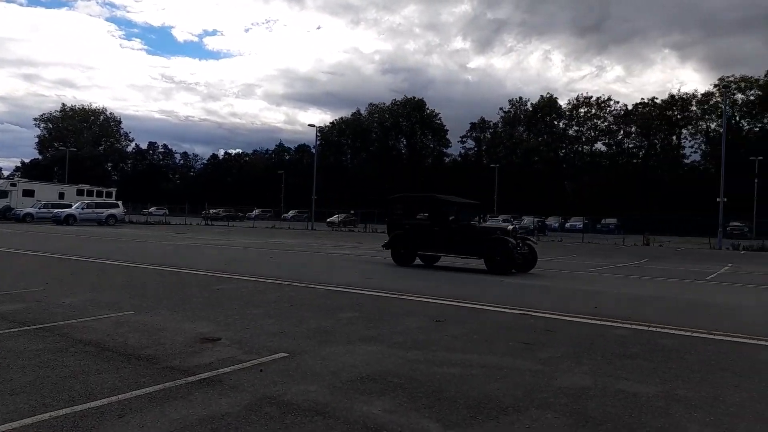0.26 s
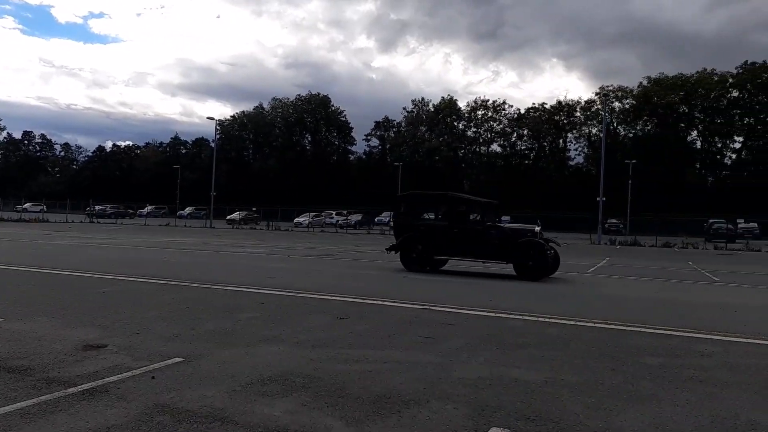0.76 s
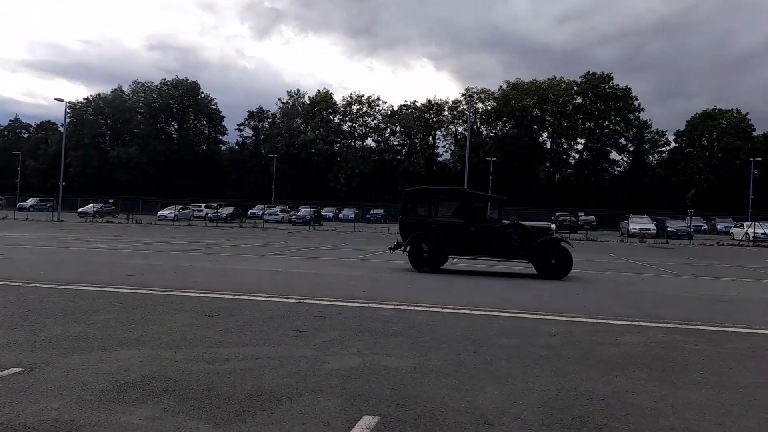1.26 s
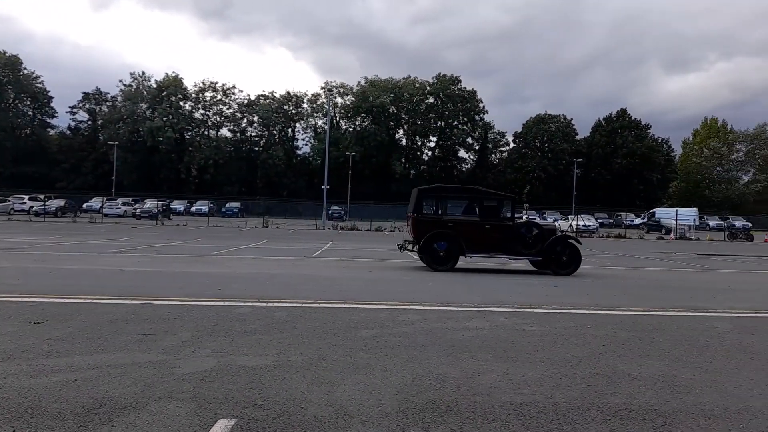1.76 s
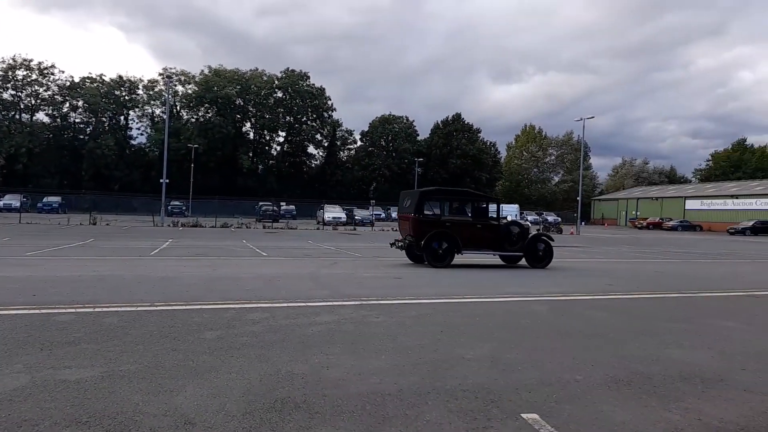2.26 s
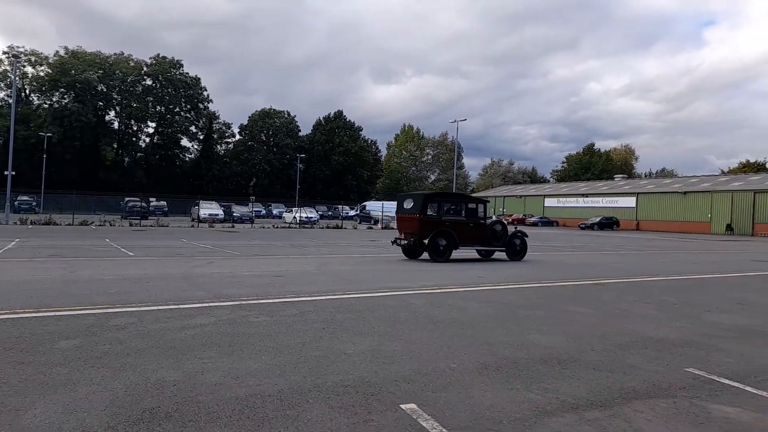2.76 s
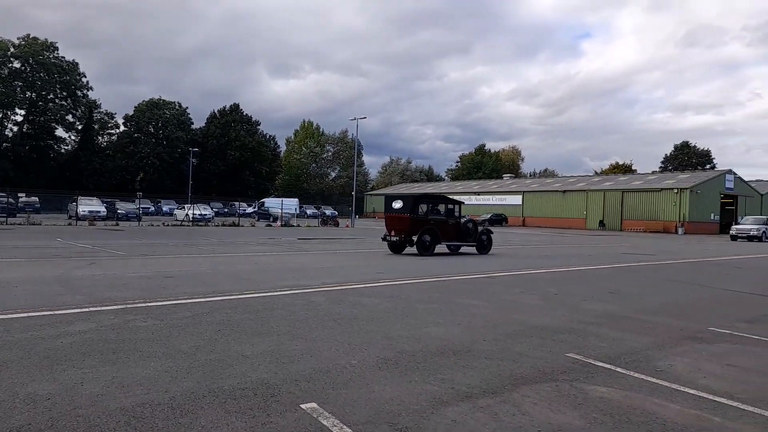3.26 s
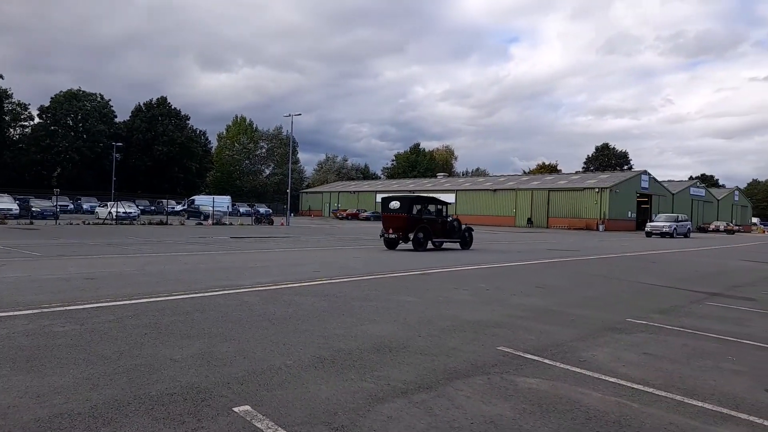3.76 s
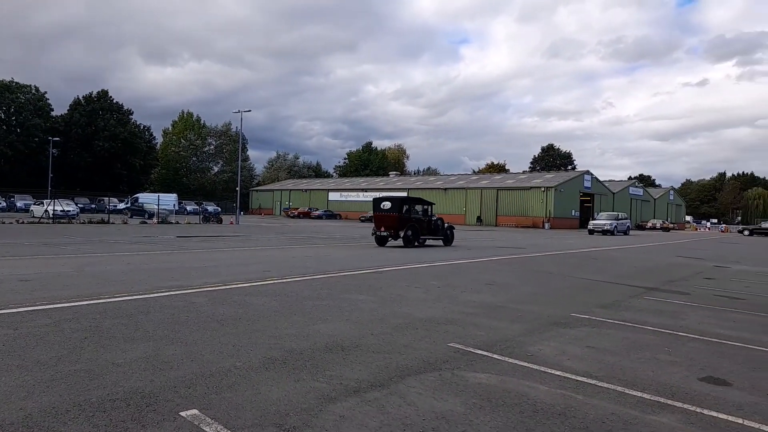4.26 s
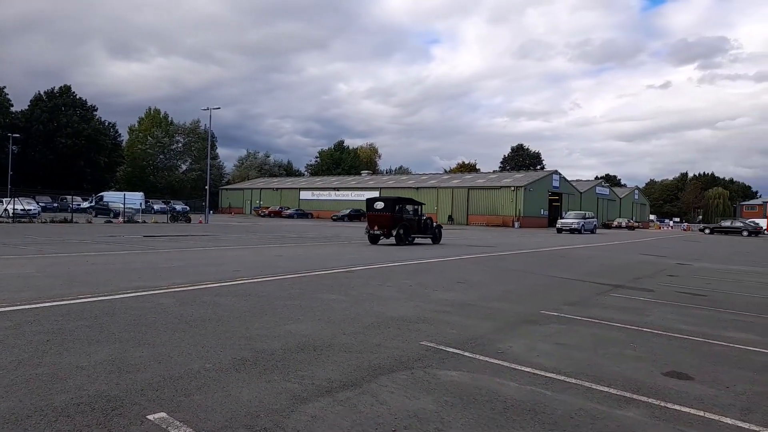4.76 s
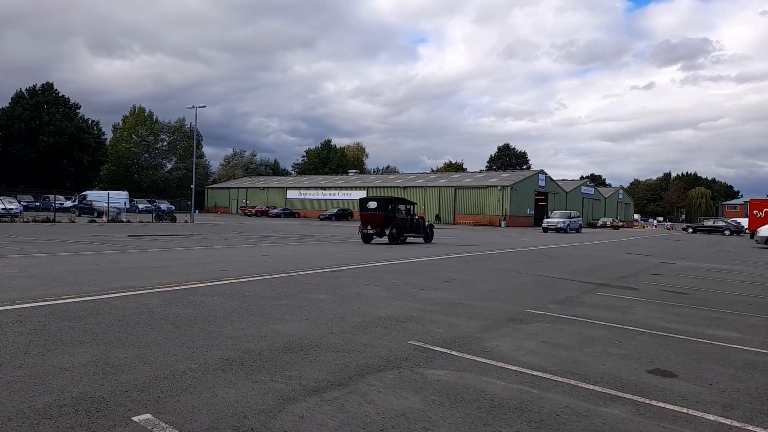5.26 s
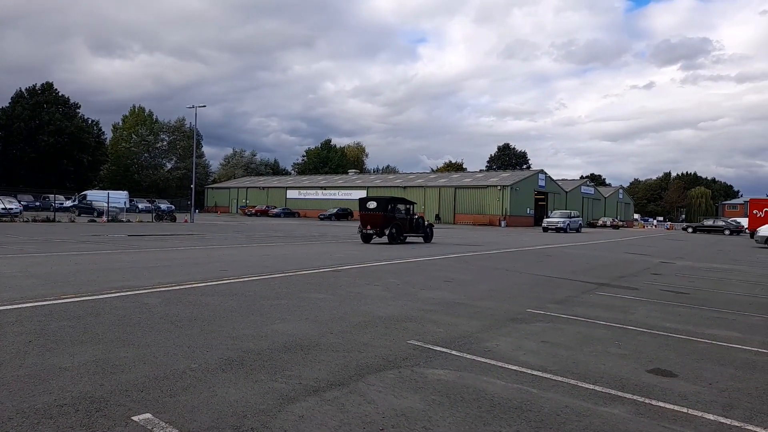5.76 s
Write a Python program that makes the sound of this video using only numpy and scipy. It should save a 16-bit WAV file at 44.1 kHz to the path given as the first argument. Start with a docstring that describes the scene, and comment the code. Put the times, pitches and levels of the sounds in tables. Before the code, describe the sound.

In an open car park with a soft distant road wash, a vintage four-cylinder car pulls away in low gear. From 0 to 2.1 seconds its buzzing exhaust drone and gear whine climb, the rise gradually flattening, over rough growl and clatter pulsing with each firing. A stone snaps near 1.8; a faint metallic tick appears around 2. At 2.2 a low thump marks the lift-off: whine and exhaust vanish quickly, leaving fading mechanical noise. Wind buffets mainly the left from 1.5 to 3, strongest near 2.6. Irregular dull thumps continue from 2.7 to 4.4, with thin, very high brake squeals around 3.4, echoing lightly. From about 4 a nearer car swells in, humming low, passing left to right around 4.75. Stones snap; short, slightly lower squeals sound near 4.85 and 5.2. Tyre roar peaks around 5, with rush and hiss building, then darkens and begins receding by 6.

```python
"""A vintage four-cylinder car accelerates across an open car park in low gear, then lifts off and coasts away.
Its exhaust and gear whine are tones locked to the crank; its clatter is noise throbbing with each firing.
Wind is coloured noise, with gusts mostly on the left; low thumps and snapping stones are short bursts.
A second car rolls close past from left to right: a tonal engine hum, tyre noise whose colour deepens,
and a few high brake squeals that echo. A distant road washes underneath."""
import sys
import numpy as np
from scipy import signal
from scipy.fft import rfft, irfft
from scipy.io import wavfile
from scipy.ndimage import uniform_filter1d, map_coordinates

SR = 44100
rng = np.random.default_rng(int(sys.argv[2]) if len(sys.argv) > 2 else 0)


def wav_record(signal):
    """Record a signal, one row per channel, as 16-bit PCM in the file named by sys.argv[1]."""
    frames = np.transpose(np.atleast_2d(signal))
    bounded = np.clip(frames, -1, 1)
    # unit amplitude maps onto the largest positive 16-bit level
    quanta = np.round(bounded * 32767).astype(np.int16)
    wavfile.write(sys.argv[1], SR, quanta)


N = 264582
TIME = np.arange(N) / SR
FREQS = np.fft.rfftfreq(N, 1 / SR)


def gain_of(db):
    """Decibels to amplitude."""
    return 10 ** (np.asarray(db) / 20)


def evened(x):
    """Scales to rms 1."""
    return x / np.sqrt(np.mean(x ** 2) + 1e-20)


def read(points, hz):
    """Reads a curve of (hz, value) along a log-frequency axis."""
    f, value = np.transpose(points)
    return np.interp(np.log(hz + 1), np.log(f + 1), value)


def drift(rate_hz):
    """Slow random motion of about rms 1, made of noise with the motion above rate_hz filtered away."""
    points = 4096
    hz = np.fft.rfftfreq(points, N / SR / points)
    coarse = irfft(rfft(rng.standard_normal(points)) / (1 + (hz / rate_hz) ** 4))
    return np.interp(TIME, np.linspace(0, N / SR, points), evened(coarse))


def noise(colour):
    """Noise with a given spectrum, at rms 1."""
    return evened(irfft(rfft(rng.standard_normal(N)) * gain_of(read(colour, FREQS)), N))


def arriving(x, lead_ms):
    """Left/right pair: a source on the right (positive lead) reaches the right microphone first."""
    half = lead_ms * SR / 2000
    sides = (-1, 1)
    return np.array([map_coordinates(x, [np.arange(N) + side * half], order=3, mode="nearest") for side in sides])


# Likeness of scattered sound at the two microphones: frequency_hz, likeness (-1 to 1)
LIKENESS = [(60, -0.85), (250, 0.35), (450, 0.85), (700, -0.6), (1300, -0.61), (2500, 0.47), (15000, -0.16)]


def outdoors(colour, lead_ms, scattered):
    """Noise from one direction, with a share (0-1) scattered by ground, trees and buildings."""
    left, other = rfft(rng.standard_normal((2, N)))
    same = np.clip(read(LIKENESS, FREQS), -1, 1)
    share = np.clip(scattered, 0, 1)
    right = same * left + np.sqrt(1 - same ** 2) * other
    spread = irfft(np.array([left, right]) * gain_of(read(colour, FREQS)), N)
    return np.sqrt(1 - share) * arriving(noise(colour), lead_ms) + np.sqrt(share) * evened(spread)


def partial(turns, multiple, fade_db, fade_rate_hz, lag=None):
    """One tone of a rotating part, fading in and out by chance; its lag (cycles) is random unless given."""
    lag = rng.random() if lag is None else lag
    return np.sqrt(2) * gain_of(fade_db * drift(fade_rate_hz)) * np.cos(2 * np.pi * (multiple * turns - lag))


def swell(from_s, until_s, db, rise_db_per_s, fall_db_per_s):
    """A level in dB that rises, holds and falls."""
    return db - rise_db_per_s * np.maximum(from_s - TIME, 0) - fall_db_per_s * np.maximum(TIME - until_s, 0)


def puff(s, length_s):
    """A smooth rise and fall around one moment."""
    return np.exp(-(2 * (TIME - s) / length_s) ** 2)


def swept(pair, peak, boost_db, octaves):
    """Makes one moving band stand out: lifts it by half of boost_db and lowers the rest by half."""
    hz, t, z = signal.stft(pair, SR, nperseg=1024, noverlap=768)
    centre = np.interp(t, *np.transpose(peak))
    away = np.log2((hz[:, None] + 1) / centre) / octaves
    tilt = gain_of(boost_db * (np.exp(-away ** 2) - .5))
    return signal.istft(z * tilt, SR, nperseg=1024, noverlap=768)[1][:, :N]


LIFT_OFF_S, DIE_DB_PER_S = 2.16, 74  # the driver lifts off; exhaust note and growl die away at this rate
RECEDE_DB_PER_S = 1.5  # the vintage car drives away


def coasting():
    """Seconds since the driver lifted off."""
    return np.maximum(TIME - LIFT_OFF_S, 0)


# crank: turns per second, gain per second, loss of that gain per second
START_SPEED, PULL, PULL_FADE = 44.33, 7.62, 1.2
CLUTCH_S, SETTLED_SPEED, SINK_S = 2.27, 53, 0.31  # clutch down: speed sinks towards this, time constant


def crank_speed():
    """Turns per second: a flattening climb under load, then an exponential sag with the clutch down."""
    pulling = np.minimum(TIME, CLUTCH_S)
    climb = START_SPEED + PULL * pulling - PULL_FADE * pulling ** 2 / 2
    return SETTLED_SPEED + (climb - SETTLED_SPEED) * np.exp(-(TIME - pulling) / SINK_S)


def machine_level(db, drop_db, settle_s):
    """Mechanical noise fades with distance and settles lower once the load is off."""
    return db - RECEDE_DB_PER_S * TIME - drop_db * (1 - np.exp(-coasting() / settle_s))


def sizzle_db():
    """Level of the vintage car's fine high mechanical noise, which also scales its small stones."""
    return machine_level(-41, drop_db=30, settle_s=0.87)


# Exhaust tones: crank_multiple, relative_level_db
ORDERS_DB = [(1, 4.5), (2, 0), (2.5, -20.5), (3, 1), (4, 2.5), (5, -1), (6, -14), (7, -15), (8, -2.5),
             (9, -14), (10, -14), (11, -17), (13, -19.5), (14, -20), (31, -27)]
# Colour of the silencer and tail pipe: frequency_hz, gain_db
PIPE = [(45, -21), (60, -14), (90, -1.5), (115, 5.5), (136, 4), (170, -12), (200, -4), (230, -11),
        (280, -14), (400, -11), (800, -3), (1800, -6)]
# the pipe delays higher orders more, smearing the puffs into a drone: lag in cycles per squared multiple
PIPE_SMEAR = .28


def exhaust(speed, turns, load_db, low_fade_db=1.74, high_fade_db=3, trim_db=-6.5):
    """Two firings a turn; unequal cylinders add the other orders, and the pipe colours them as they climb."""
    lines = np.zeros(N)
    for k, db in ORDERS_DB:
        fade_db = low_fade_db if k < 5 else high_fade_db
        piped = gain_of(db + read(PIPE, k * speed))
        lines += piped * partial(turns, k, fade_db, 5.7, PIPE_SMEAR * k ** 2)
    uneven_firing = 1 + 0.068 * drift(21)
    return lines * uneven_firing * gain_of(load_db + trim_db)


# teeth meeting per turn of the crank in the two gear pairs and the timing gear
FIRST_MESH, SECOND_MESH, TIMING_TEETH = 6.19, 4.315, 24
GEARS_DIE_DB_PER_S = 120  # unloaded teeth fall silent faster than the exhaust
# Whines swelling through casing resonances: crank_multiple, level_db, resonance_hz, width_hz, boost_db
WHINES = [(FIRST_MESH, -32.5, 328, 46, 13), (SECOND_MESH, -35, 242, 16, 8), (8.3, -52, 464, 32, 16),
          (2 * FIRST_MESH, -46, 645, 44, 10), (16, -47, 850, 50, 9), (3 * FIRST_MESH, -46, 1050, 36, 4),
          (22.1, -57, 1237, 28, 14), (TIMING_TEETH, -56, 1140, 120, 14),
          (4 * FIRST_MESH, -51, 1252, 46, 15.5), (TIMING_TEETH, -54, 1357, 44, 17.5),
          (32, -58, 1620, 160, 9)]
# Overtones of the meshes: gear_pair (1 or 2), mesh_multiple, level_db
OVERTONES = [(1, 5, -51.5), (2, 2, -49.5), (2, 3, -59), (2, 5, -53)]


def gears(turns, overtone_fade_db=2.0, whine_fade_db=.5, low_flutter=0.21, high_flutter=0.31):
    """Straight-cut teeth whine at fixed multiples of the crank; the load on them flutters."""
    speed, low, high = crank_speed(), np.zeros(N), np.zeros(N)
    for multiple, db, hz, width, boost_db in WHINES:
        ringing_db = boost_db / (1 + (2 * (multiple * speed - hz) / width) ** 4)
        line = gain_of(db + ringing_db) * partial(turns, multiple, whine_fade_db, 6)
        if multiple < 10:
            low += line
        else:
            high += line
    for pair, k, db in OVERTONES:
        mesh = FIRST_MESH if round(pair) == 1 else SECOND_MESH
        low += gain_of(db) * partial(turns, round(k) * mesh, overtone_fade_db, 1.4)
    whine = low * (1 + low_flutter * drift(45)) + high * (1 + high_flutter * drift(50))
    return gain_of(-GEARS_DIE_DB_PER_S * coasting()) * whine


# Push of the four cylinders, in firing order: relative_strength
CYLINDERS = [1.5, .7, 1.4, .6]
# Engine block and bonnet resonances: frequency_hz, relative_level_db, t60_s
BLOCK = [(481, -0.5, 0.0305), (648, -6, 0.019), (742, 2, 0.023), (955, -3, 0.012), (1140, -12, 0.011),
         (1480, -11, 0.051), (2070, -9.5, 0.0093)]
GROWL_DB, GROWL_ROUGH = -32, .35  # level before the fades; how much one firing differs from the next


def growl(turns):
    """Each firing strikes the block, never twice quite alike; the ringing dies away with the load."""
    firing = (2 * turns).astype(int)
    blows = np.diff(firing, prepend=0) * np.take(CYLINDERS, firing, mode="wrap")
    t = TIME[:SR // 20]
    rings = np.zeros(N)
    for hz, db, t60 in BLOCK:
        ring = gain_of(db - 60 * t / t60) * np.sin(2 * np.pi * hz * t)
        uneven_blows = blows * (1 + GROWL_ROUGH * rng.standard_normal(N))
        rings += signal.oaconvolve(uneven_blows, ring)[:N]
    return gain_of(GROWL_DB - RECEDE_DB_PER_S * TIME - DIE_DB_PER_S * coasting()) * evened(rings)


# each firing's clatter builds up over this time and decays with this share of the gap to the next
FIRING_RISE_S, FIRING_DECAY = .0016, .3


def firing_throb(turns, depth=0.5):
    """Pulsing envelope of rms 1: one smoothed, decaying pulse for each firing, plus a little chance."""
    strength = np.take(CYLINDERS, (2 * turns).astype(int), mode="wrap")
    firings = strength * np.exp(-(2 * turns % 1) / FIRING_DECAY)
    rise = round(FIRING_RISE_S * SR)
    smooth = uniform_filter1d(uniform_filter1d(firings, rise), rise)
    return evened(1 + depth * smooth + 0.11 * drift(60))


# Clatter of valve gear, fan and chassis: frequency_hz, gain_db
CLATTER_COLOUR = [(70, -32), (130, -13), (170, -15), (270, -11.5), (330, -6), (385, -20.5), (465, -14),
                  (585, -20), (835, -21), (1370, -25), (1700, -27.5), (2700, -35), (3500, -43.5),
                  (4550, -61), (7700, -120)]
# Fine high noise of the machinery: frequency_hz, gain_db
SIZZLE_COLOUR = [(1800, -1), (2700, 2), (3300, -5.5), (4300, -5.5), (6300, -6), (7300, -8.5), (8200, -17.5),
                 (10000, -14.5), (11200, -12), (15600, -18)]
# Brightest band of the engine noise, sinking as the car drives on: time_s, frequency_hz
ENGINE_PEAK = [(0.1, 1060), (.75, 990), (1.25, 814), (1.8, 760), (2.8, 664)]


def machinery(turns, lead_ms, sizzle_throb=0.9, peak_db=5.0, peak_octaves=0.24):
    """Clatter and sizzle are noise throbbing with each firing; the block growls among them."""
    throb = firing_throb(turns)
    clatter_gain = gain_of(machine_level(-24.5, drop_db=14, settle_s=0.36))
    clatter = throb * clatter_gain * outdoors(CLATTER_COLOUR, lead_ms, scattered=0.23)
    body = swept(clatter + arriving(growl(turns), lead_ms), ENGINE_PEAK, peak_db, peak_octaves)
    sizzle = abs(throb) ** sizzle_throb * gain_of(sizzle_db()) * outdoors(SIZZLE_COLOUR, lead_ms, scattered=0.59)
    return body + sizzle


# Exhaust level as the driver works the throttle, before the exhaust trim: time_s, load_db
THROTTLE = [(0, -20), (1.25, -20.5), (1.5, -21), (1.68, -20.5), (2.1, -22.5)]


def vintage_car(lead_ms=0.09):
    """One slightly unsteady crank drives the exhaust, gear whine, machinery and a loose fitting."""
    speed = crank_speed() * (1 + .002 * drift(16))
    turns = np.cumsum(speed) / SR
    load_db = np.interp(TIME, *np.transpose(THROTTLE)) - DIE_DB_PER_S * coasting()
    tones = exhaust(speed, turns, load_db) + gears(turns)
    return arriving(tones, lead_ms) + machinery(turns, lead_ms) + rattle(turns)


# Colour of the distant road: frequency_hz, gain_db
TRAFFIC = [(88, -17), (150, -2), (280, -3.5), (370, -6), (460, -3.5), (570, -9.5), (810, 1.5), (1100, -9.5),
           (1700, -16), (3050, -33), (6000, -33.5), (7300, -40.5), (8200, -52), (12000, -42.5),
           (15600, -46)]


def distant_road():
    """Far traffic blends into a slowly wavering, widely scattered wash of noise."""
    return gain_of(-34 + 1.7 * drift(2.9)) * outdoors(TRAFFIC, 0.086, scattered=0.96)


# Rumble of air and cars: frequency_hz, gain_db
RUMBLE_COLOUR = [(20, -30), (35, -12.5), (55, 4.5), (75, 4), (120, 3.5), (170, -5), (260, -15.5),
                 (500, -58), (3000, -110)]
# Strongest gusts, at their left-hand levels: time_s, length_s, level_db, flutter_level_db
GUSTS = [(1.626, 0.049, -41, -45), (2.595, 0.036, -15.5, -24), (2.656, 0.024, -15.5, -33),
         (2.801, 0.11, -25, -30.5), (2.92, 0.064, -34, -22.5)]
# Body of a gust: frequency_hz, gain_db
GUST_COLOUR = [(20, -29), (45, -9), (90, 5), (140, -4), (250, -13.5), (400, -27), (800, -53), (4000, -100)]
# Higher flutter of a gust: frequency_hz, gain_db
FLUTTER_COLOUR = [(70, -36), (140, 4), (260, 0), (400, -12), (600, -24), (2000, -80)]


def wind(right_db=-16, lump_db=1.8, apart_db=-4.5, buffet_db=2):
    """A lumpy rumble of air and cars, deep eddies at each microphone alone, and gusts mostly on the left."""
    eddy_colour = [(20, -22), (40, 14), (60, 6.0), (110, 5), (250, -17), (500, -37), (3000, -110)]
    apart = gain_of(apart_db) * np.array([noise(eddy_colour) for _ in range(2)])
    air = gain_of(-39)
    vintage = gain_of(swell(0.45, 2.1, -33.5, rise_db_per_s=14, fall_db_per_s=14))
    near = gain_of(swell(5, 5.5, -31, rise_db_per_s=7.5, fall_db_per_s=5))
    level = np.sqrt(air ** 2 + vintage ** 2 + near ** 2)
    rumble = level * gain_of(lump_db * drift(24.0)) * (noise(RUMBLE_COLOUR) + apart)
    breeze_db = swell(1.5, 3, -28.5, rise_db_per_s=158, fall_db_per_s=262)
    gusts = gain_of(breeze_db + buffet_db * drift(15))
    gusts += sum(gain_of(db) * puff(s, length) for s, length, db, _ in GUSTS)
    flutter = sum(gain_of(db) * puff(s, length) for s, length, _, db in GUSTS)
    left, right = (gusts * noise(GUST_COLOUR) + flutter * noise(FLUTTER_COLOUR) for _ in range(2))
    return rumble + np.array([left, gain_of(right_db) * right])


# Loudest stones flicked by the tyres: time_s, level_db
GRIT = [(1.7679, -32.5), (3.9798, -49), (4.365, -35.5), (4.5675, -44)]
# Colour of a stone's snap: frequency_hz, gain_db
GRIT_COLOUR = [(300, -60), (1500, -9), (3000, 5), (4500, 9), (6500, 2.5), (9000, -24), (15000, -18)]
# small stones: rate, then level against the vintage car's sizzle and the near car's tyre hiss
STONES_PER_S, VINTAGE_STONES_DB, NEAR_STONES_DB = 28, -26, 6


def grit(t60=.024, small_t60=.02):
    """Stones snap out from under the tyres as decaying noise: a few loud ones and a scatter of small ones."""
    loud = sum(gain_of(db - 60 * np.maximum(TIME - s, 0) / t60) * (TIME >= s) for s, db in GRIT)
    size = gain_of(sizzle_db() + VINTAGE_STONES_DB) + gain_of(tyre_hiss_db() + NEAR_STONES_DB)
    stones = (rng.random(N) < STONES_PER_S / SR) * rng.uniform(0.185, 0.4, N) * size
    small = signal.lfilter([1], [1, -gain_of(-60 / (small_t60 * SR))], stones)
    return (loud + small) * outdoors(GRIT_COLOUR, 0, scattered=0.99)


# Colour of the loose fitting: frequency_hz, gain_db
RATTLE_COLOUR = [(2500, -50), (4800, -16), (5700, -2), (6700, 0), (7400, -8), (8000, -20), (15000, -24)]
# place of its knock in the crank's turn (0-1), decay (s), every other knock's strength, scatter (dB)
KNOCK_AT, KNOCK_DECAY_S, WEAK_KNOCK, KNOCK_SCATTER_DB = .78, .0038, .65, 2


def rattle(turns):
    """Near top speed a loose fitting ticks once every turn of the crank, strong and weak by turns."""
    knock, since = np.divmod(turns + 1 - KNOCK_AT, 1)
    knock = knock.astype(int)
    scatter = gain_of(KNOCK_SCATTER_DB * rng.standard_normal(N)[knock])
    strength = np.where(knock % 2, WEAK_KNOCK, 1) * scatter
    ticks = evened(strength * np.exp(-since / crank_speed() / KNOCK_DECAY_S))
    level_db = swell(1.95, 2.1, -47, rise_db_per_s=22, fall_db_per_s=80)
    return gain_of(level_db) * ticks * outdoors(RATTLE_COLOUR, 0.084, scattered=0.27)


# Low thumps: time_s, length_s, pitch_hz, level_db
BUMPS = [(2.162, 0.024, 298.6, -18.5), (2.708, 0.016, 83.8, -21.5), (2.986, .04, 65, -28),
         (3.094, 0.013, 85, -24.5), (3.134, 0.04, 63.9, -21.5), (3.344, 0.013, 95, -25.5),
         (3.421, 0.012, 78.9, -22), (3.474, 0.013, 108, -25), (3.522, 0.033, 90, -25),
         (3.55, 0.0039, 148.8, -17), (3.594, 0.022, 104, -22.5), (3.627, 0.046, 95.3, -24.5),
         (3.785, 0.015, 72.1, -23.5), (3.842, 0.0099, 89.3, -19), (3.942, 0.032, 70.4, -24),
         (4.091, 0.013, 98.8, -26), (4.107, .018, 86.2, -34), (4.238, 0.014, 88.6, -22),
         (4.35, 0.017, 94.3, -25), (4.435, 0.036, 75, -25)]


def bumps(rough=0.23):
    """Low thumps: short swells of a sine at a random phase, with a rough level."""
    swings = np.zeros(N)
    for s, length, hz, db in BUMPS:
        swings += gain_of(db) * puff(s, length) * np.sin(2 * np.pi * (hz * TIME + rng.random()))
    return swings * (1 + rough * drift(54))


# Brake squeals, levels before sag and trim: start_s, length_s, start_hz, end_hz, level_db, rasp (0-1)
SQUEALS = [(3.31, .065, 10840, 10910, -56, .2), (3.357, .041, 10920, 10790, -29.5, .15),
           (3.387, .046, 10800, 10745, -28, .15), (3.423, .044, 10760, 10735, -29, .15),
           (3.455, .06, 10850, 10730, -51, .3), (4.825, .04, 8270, 8200, -47, .15),
           (4.85, .043, 8160, 8172, -35.5, .08), (4.88, .068, 8200, 8190, -50, .2),
           (5.205, .055, 8400, 8305, -35, .05), (5.24, .04, 8310, 8330, -44, .05),
           (5.285, .118, 8310, 8355, -38, .04)]
# Echoes from the wheel arch, a far wall and the whole car park: delay_s, level_db, t60_s
SQUEAL_ECHOES = [(0, -18, .08), (.18, -26, .04), (0, -30, 1.3)]
# each squeal catches quickly, weakens and lets go; its pitch settles on the way
SQUEAL_ATTACK_S, SQUEAL_SAG_DB_PER_S, SQUEAL_RELEASE_S, SQUEAL_SETTLE_S = .02, 50, .02, .016


def brakes(waver=.0012, lead_ms=.024, trim_db=2):
    """A brake disc sings in short, slightly rasping bursts that echo round the car park."""
    dry = np.zeros(N)
    for start, length, start_hz, end_hz, db, rasp in SQUEALS:
        now = (TIME >= start) & (TIME < start + length)
        t = TIME[now] - start
        grip = np.minimum(t / SQUEAL_ATTACK_S, 1) * np.minimum((length - t) / SQUEAL_RELEASE_S, 1)
        settling_hz = end_hz + (start_hz - end_hz) * np.exp(-t / SQUEAL_SETTLE_S)
        hz = settling_hz * (1 + waver * drift(76)[now])
        roughness = 1 + rasp * (drift(200) + 1j * drift(200))[now]
        tone = np.exp(2j * np.pi * np.cumsum(hz) / SR) * roughness
        level = np.sqrt(2) * gain_of(db - SQUEAL_SAG_DB_PER_S * t)
        dry[now] += level * np.sin(np.pi / 2 * grip) ** 2 * tone.real
    out = gain_of(trim_db) * arriving(dry, lead_ms)
    t = TIME[:SR]
    for delay, db, t60 in SQUEAL_ECHOES:
        tail = rng.standard_normal((2, SR)) * gain_of(-60 * t / t60) * (t >= delay)
        tail /= np.linalg.norm(tail[0])
        out += gain_of(db) * signal.fftconvolve(dry[None], tail, axes=1)[:, :N]
    return out


# moment straight ahead, time to cover its own distance from us, limit of the lead at one microphone
AHEAD_S, CROSS_S, WIDEST_LEAD_MS = 4.75, 1, 0.5


def bearing():
    """Where the near car is, from -1 (far left) to 1 (far right)."""
    return (TIME - AHEAD_S) / np.hypot(TIME - AHEAD_S, CROSS_S)


# Near car's engine tones: firing_rate_multiple, relative_level_db
HUM_TONES = [(1, -3.5), (1.5, -10), (2, -5), (2.5, -12.5)]
FIRING_HZ, SLOWING_HZ_PER_S = 67.77, 5  # firing rate when straight ahead, and how fast it slows


def engine_hum():
    """A slowing engine hums at multiples of its firing rate."""
    firing_hz = FIRING_HZ - SLOWING_HZ_PER_S * (TIME - AHEAD_S)
    turns = np.cumsum(firing_hz * (1 + 0.0063 * drift(8.3))) / SR
    tones = sum(gain_of(db) * partial(turns, k, 0.5, 6.3) for k, db in HUM_TONES)
    return gain_of(swell(5, 3.5, -28.5, rise_db_per_s=14.5, fall_db_per_s=0)) * tones


# Tyre roar as the car comes: frequency_hz, gain_db
ROAR_COMING = [(120, -7.5), (200, -2), (259, -16), (338, -6), (445, -11), (594, -3.5), (813, -4.5),
               (981, -15), (1300, -17), (1690, -57), (2860, -120)]
# Tyre roar as the car goes: frequency_hz, gain_db
ROAR_GOING = [(120, -51), (200, -24), (227, -14), (259, -10), (317, -3.5), (496, -3.5), (658, -4),
              (806, -7.5), (1140, -18), (1300, -29), (1690, -65), (2860, -120)]
# Upper strong band of the roar, sinking as the car goes by: time_s, frequency_hz
ROAR_PEAK = [(4.2, 920), (4.47, 810), (4.97, 730), (5.45, 670)]
# Lower strong band of the roar, sinking likewise: time_s, frequency_hz
ROAR_LOW_PEAK = [(4.4, 600), (4.95, 510), (5.22, 440), (5.58, 335)]
# Surges of the roar on rougher ground: time_s, length_s, boost_db
SURGES = [(4.46, 0.043, 4), (4.974, 0.036, 1.5), (5.46, 0.11, 3)]


def tyre_roar(lead_ms, band_db=4.5):
    """Tread noise crossfades from a coming to a going colour, and its two strongest bands sink."""
    gone = np.clip((TIME - 4.6) / 0.57, 0, 1)
    tread = np.sqrt(1 - gone) * outdoors(ROAR_COMING, lead_ms, scattered=0.047)
    tread += np.sqrt(gone) * outdoors(ROAR_GOING, lead_ms, scattered=0.16)
    tread = swept(tread, ROAR_PEAK, band_db, octaves=0.26)
    tread = swept(tread, ROAR_LOW_PEAK, band_db, octaves=0.11)
    surge_db = sum(db * puff(s, length) for s, length, db in SURGES)
    level_db = swell(5, 5, -21, rise_db_per_s=13, fall_db_per_s=4)
    return gain_of(level_db + surge_db + 1.0 * drift(44)) * tread


# extra path of the rush reflected by the road, with the car ahead; it shortens as the car moves right
BOUNCE_MS, BOUNCE_SWING_MS, BOUNCE_STRENGTH = 0.62, 0.082, .33


def bounced(pair, strength):
    """Adds the reflection from the road; its changing delay sweeps the colour."""
    late = np.arange(N) - (BOUNCE_MS - BOUNCE_SWING_MS * bearing()) * SR / 1000
    reflection = np.array([np.interp(late, np.arange(N), x) for x in pair])
    return (pair + strength * reflection) / np.hypot(1, strength)


# Tyre rush, the band above the roar: frequency_hz, gain_db
RUSH_COLOUR = [(200, -70), (600, 0), (1000, 8), (1500, -0.5), (2300, -8.5), (3500, -52), (8000, -70)]
# Its brightest band, sinking from when the car is straight ahead: time_s, frequency_hz
RUSH_PEAK = [(4.75, 1800), (5.05, 1350), (5.3, 940), (5.6, 850)]


def tyre_rush(lead_ms, band_db=6):
    """Mid-high tyre noise, combed by its road reflection, grows while its brightest band sinks."""
    rush = bounced(outdoors(RUSH_COLOUR, lead_ms, scattered=0.8), BOUNCE_STRENGTH)
    rush = swept(rush, RUSH_PEAK, band_db, octaves=0.22)
    level_db = -35.5 - 17 * np.maximum(5 - TIME, 0)  # rises 17 dB a second until 5 s, then holds
    return gain_of(level_db + 2.1 * drift(46)) * rush


def tyre_hiss_db():
    """Level of the tyre hiss, which also scales the near car's small stones."""
    return swell(5.5, 5.5, -44.5, rise_db_per_s=12, fall_db_per_s=9)


# Tyre hiss: frequency_hz, gain_db
HISS_COLOUR = [(1200, -23), (1650, 0), (2300, -3), (2660, -4.5), (3070, -8.5), (4060, -9), (6770, -11.5),
               (7510, -15), (8010, -22), (12400, -17), (15600, -29.5)]
# Its brightest band, sinking as the car leaves: time_s, frequency_hz
HISS_PEAK = [(5.1, 3480), (5.4, 2770), (5.85, 1900)]


def tyre_hiss(lead_ms, band_db=6.5):
    """Fine, widely scattered tyre noise with a sinking bright band."""
    hiss = swept(outdoors(HISS_COLOUR, lead_ms, scattered=0.81), HISS_PEAK, band_db, octaves=0.5)
    return gain_of(tyre_hiss_db() + 1.0 * drift(80)) * hiss


def near_car():
    """Engine hum under three layers of tyre noise, moving left to right by arrival time at the microphones."""
    lead_ms = WIDEST_LEAD_MS * bearing()
    tyres = tyre_roar(lead_ms) + tyre_rush(lead_ms) + tyre_hiss(lead_ms)
    fade_in = np.clip((TIME - 3.6) / 0.73, 0, 1)
    return arriving(engine_hum(), lead_ms) + tyres * fade_in


def scene():
    """Both cars, wind, stones and thumps, over the wash of a distant road."""
    return vintage_car() + distant_road() + wind() + grit() + bumps() + brakes() + near_car()


def record(dry, edge_hz=15750):
    """Steep low-pass that band-limits the whole mix."""
    lowpass = signal.firwin(511, edge_hz, window=("kaiser", 9), fs=SR)
    return signal.oaconvolve(dry, lowpass[None], "same")


dry = scene()
out = record(dry)
wav_record(out)
```